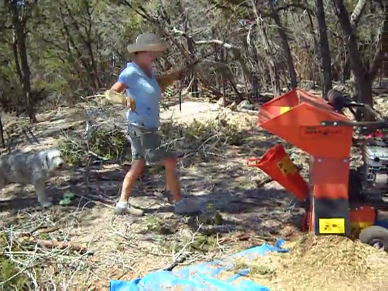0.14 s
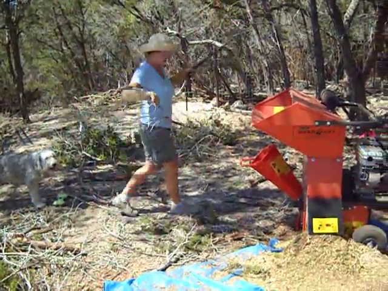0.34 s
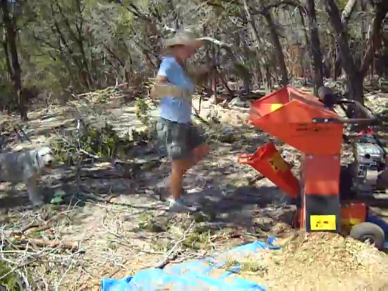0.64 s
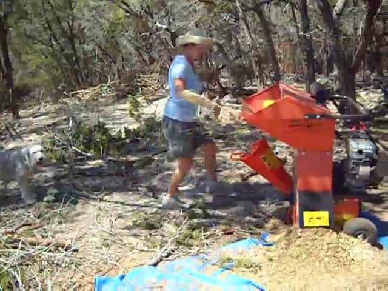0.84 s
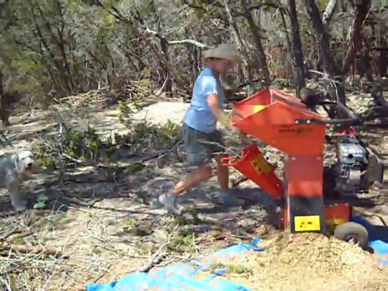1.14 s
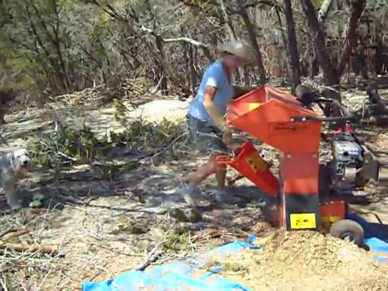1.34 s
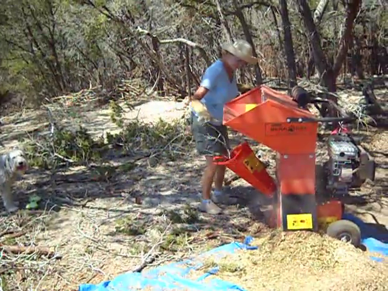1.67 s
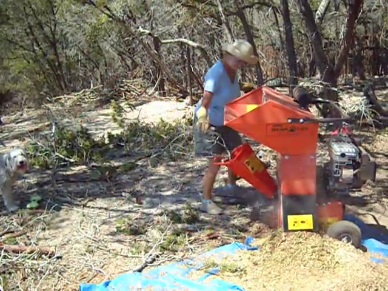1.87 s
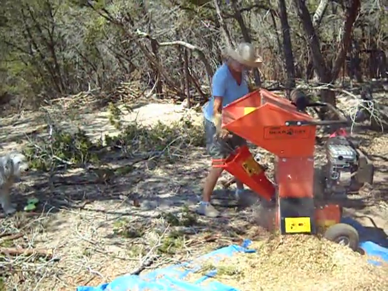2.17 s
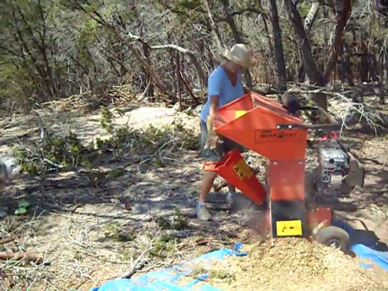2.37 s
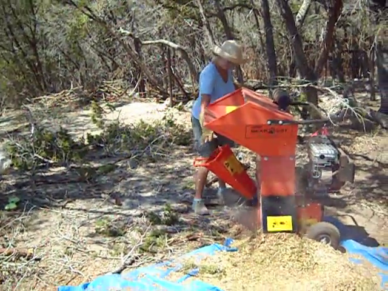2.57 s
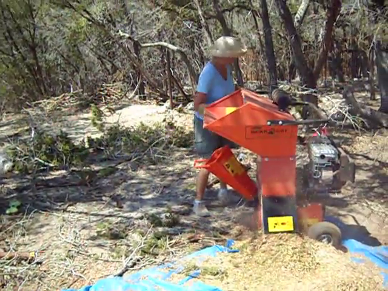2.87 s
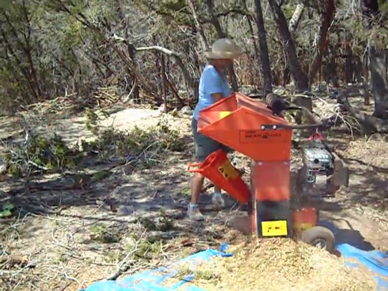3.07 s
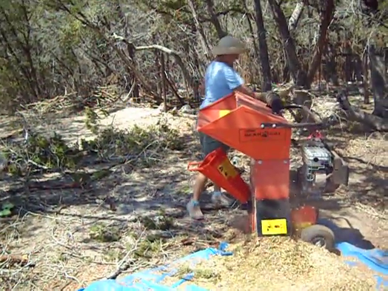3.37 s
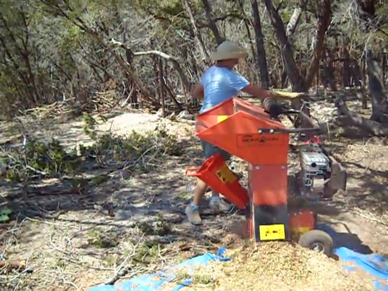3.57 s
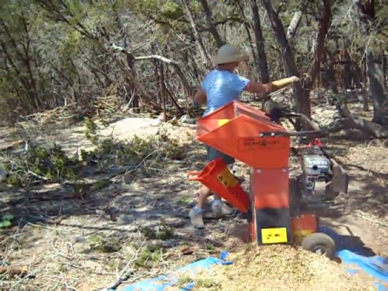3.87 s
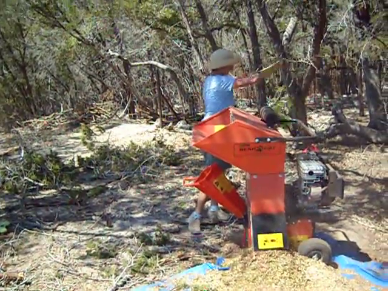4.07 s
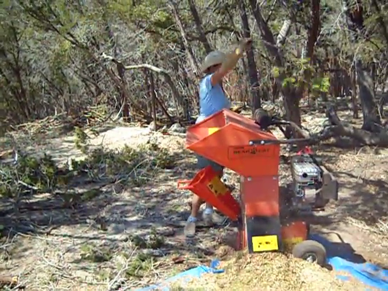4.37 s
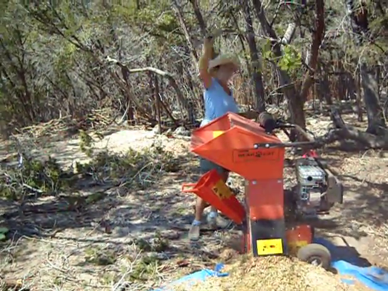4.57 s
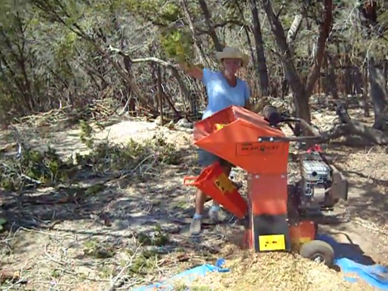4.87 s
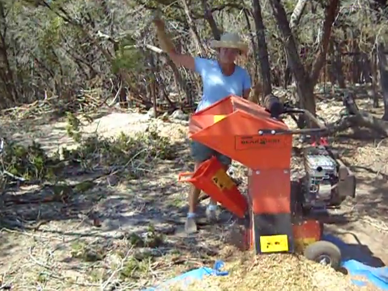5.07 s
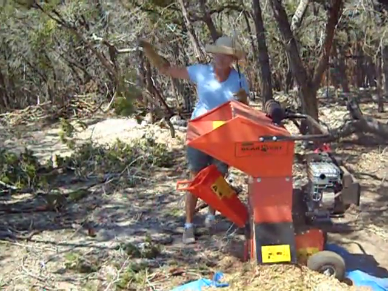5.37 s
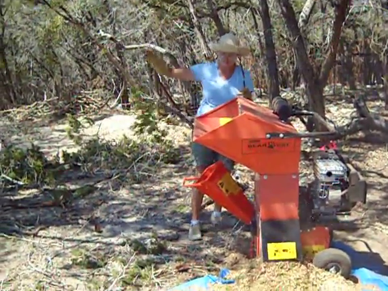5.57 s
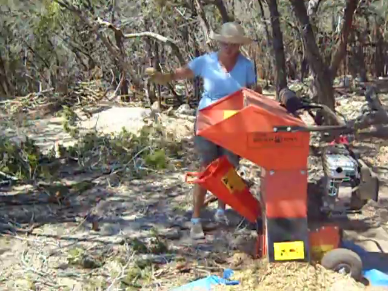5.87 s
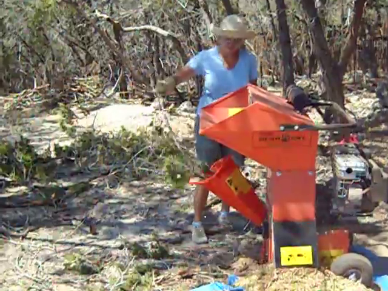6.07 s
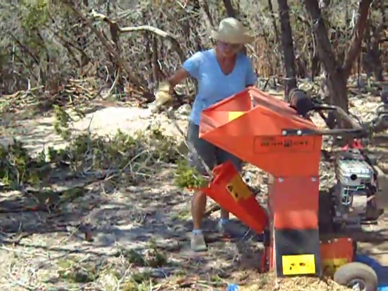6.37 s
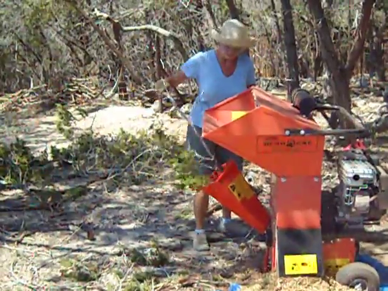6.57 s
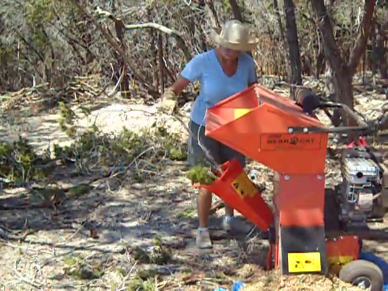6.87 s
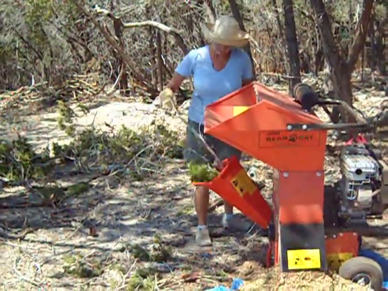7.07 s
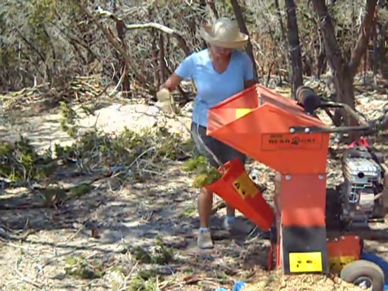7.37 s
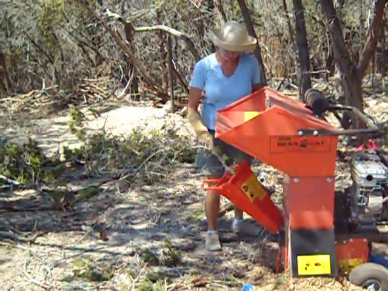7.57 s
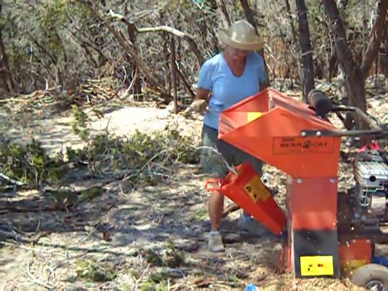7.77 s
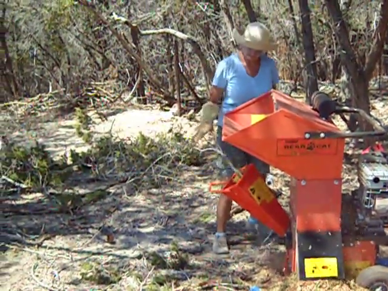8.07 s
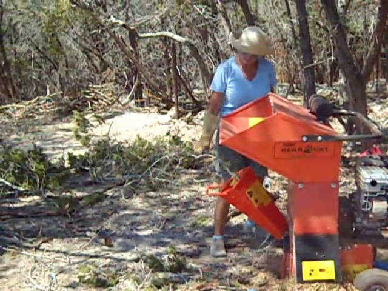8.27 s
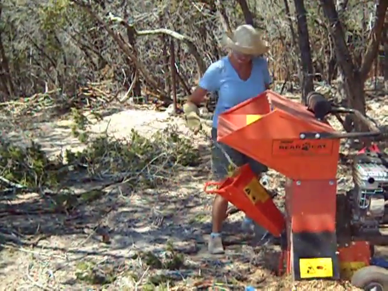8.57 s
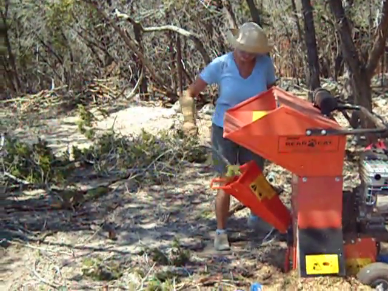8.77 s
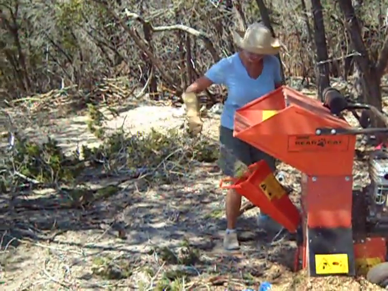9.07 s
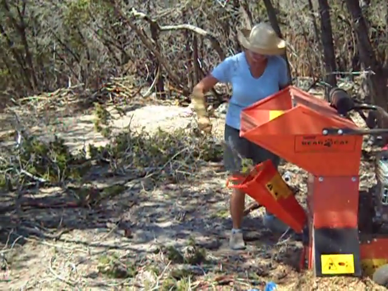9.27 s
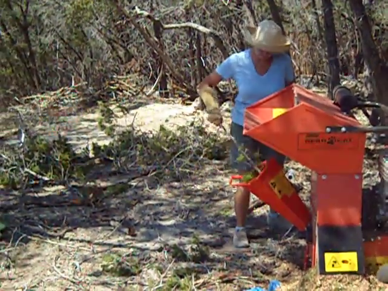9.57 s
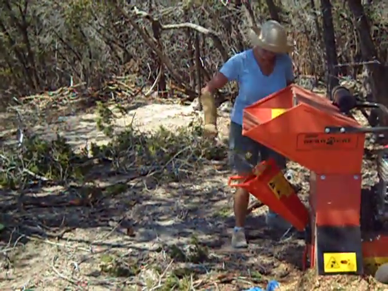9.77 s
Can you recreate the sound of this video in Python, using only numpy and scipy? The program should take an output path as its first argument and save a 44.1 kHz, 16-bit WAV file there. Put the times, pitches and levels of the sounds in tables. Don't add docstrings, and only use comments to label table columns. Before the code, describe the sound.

Steady buzzing engine roar of a garden chipper, broken by clattering, booming bites of wood and sharp chip knocks, muffled and distorted on the peaks.

```python
import sys
import numpy as np
from scipy import signal
from scipy.fft import rfft, irfft, next_fast_len
from scipy.io import wavfile

SR = 44100
rng = np.random.default_rng(int(sys.argv[2]) if len(sys.argv) > 2 else 0)


def bounce(signal):
    frames = np.transpose(np.atleast_2d(signal))
    limited = np.clip(frames, -1, 1)
    pcm = np.round(limited * 32767).astype(np.int16)
    wavfile.write(sys.argv[1], SR, pcm)


def voltage_ratio(level):
    return 10 ** (np.asarray(level, float) / 20)


N = 438354

# start_s, crank_turns_per_s, slip_turns_per_s
SHAFT_SPEEDS = [(0.0, 60.309, 0.477), (0.85, 60.303, 0.525), (1.3, 60.019, 0.654), (1.8, 60.237, 0.508),
                (2.25, 59.399, 0.745), (2.6, 59.718, 0.772), (3.15, 60.229, 0.627), (3.9, 60.349, 0.588),
                (4.7, 59.846, 0.541), (5.35, 60.365, 0.635), (6.5, 60.248, 0.478), (6.9, 60.303, 0.647),
                (7.33, 60.625, 0.527), (7.72, 58.264, 0.716), (8.05, 59.965, 0.911), (8.55, 60.172, 0.548),
                (9.0, 60.241, 0.601), (9.94, 60.36, 0.52)]
# multiple of the firing rate, level_db (rms)
FIRING_TONES = [(1, -36.5), (2, -41.5), (3, -31), (4, -18), (5, -23), (6, -26.5), (7, -30), (8, -33),
                (9, -39), (10, -30), (11, -29.5), (12, -24.5), (13, -33.5), (14, -34), (15, -37.5),
                (16, -39.5), (17, -34.5), (18, -42), (19, -29), (20, -32), (21, -43.5), (22, -25.5),
                (23, -32.5), (24, -37.5), (25, -36), (26, -27.5), (27, -42.5), (28, -43), (29, -45.5),
                (30, -33.5), (31, -36), (32, -41), (33, -37.5), (34, -50), (35, -45.5)]
# multiple of the firing rate, gain_db per unit of opening
THROTTLE_GAIN = [(1, 0), (2, 5.5), (3, 3.5), (4, -2), (5, 3.5), (6, 4), (7, 0), (10, -3)]
FRAME_ROCKING = {3: (0.082, -2.1), 4: (0.19, 0.81), 5: (0.21, 1.6), 6: (0.32, 0.28), 7: (0.25, 0.6),
                 9: (0.7, 1.8), 10: (0.94, 0.75), 11: (0.17, -3.2), 12: (0.42, -2.3), 14: (0.98, .1),
                 19: (0.078, 2.2), 22: (0.11, 1.8), 24: (0.36, -1.8), 26: (0.26, -1.9)}
# multiple of the firing rate, slips below it, level_db (rms), sign
FRAME_TONES = [(4, 1, -37, -1), (6, 2, -33, -1), (22, 10, -36, 1)]
# multiple of the rotor speed, level_db (rms), sign against the engine
ROTOR_TONES = [(1, -40, 1), (2, -32.5, -1), (3, -44, -1), (4, -24, -1), (5, -36, 1), (6, -28, -1),
               (8, -35, 1), (10, -33, -1), (11, -41, 1), (12, -28, -1), (14, -30, 1), (16, -38, 1)]
# multiple of the rotor speed, level_db (rms)
PULLEY_TONES = [(3.243, -35), (6.486, -39), (11.35, -37)]
# start_s, length_s, panel_boom_db, splinter_crackle_db
TWIG_BITES = [(1.07, 0.032, -10.5, -16.5), (1.122, .035, -10.5, -19.5), (1.36, 0.049, -11, -16.5),
              (1.411, 0.055, -6, -18.5), (1.718, .015, -27, -26.5), (2.016, 0.063, -3.5, -9),
              (2.104, 0.096, -5, -13.5), (2.171, 0.036, -6.5, -12), (2.221, 0.037, -8, -12.5),
              (2.292, .07, -5, -10), (2.44, 0.14, -7, -13), (2.608, 0.036, -10, -18.5),
              (2.861, .04, -14, -22.5), (3.395, .04, -15.5, -20.5), (3.613, 0.036, -21, -24),
              (4.097, .08, -13.5, -18.5), (4.379, 0.051, -11, -20), (4.444, 0.049, -12.5, -20),
              (4.533, .025, -13, -13), (4.71, 0.08, -18.5, -18.5), (4.859, 0.016, -14, -19.5),
              (5.087, .04, -28, -23), (5.317, 0.067, -30, -22), (5.446, .03, -25.5, -18),
              (5.884, 0.057, -22, -19.5), (7.514, .1, -3, -10.5), (7.633, 0.1, -2, -8),
              (7.794, .08, -9, -16.5), (8.007, 0.038, -17, -31), (8.618, .05, -15.5, -24)]
# pitch_hz, width_hz, level_db
PANEL_RINGS = [(357, 36, -6.5), (425, 35, -11), (468.5, 16, -11.5), (529.4, 40, -10.5), (594.6, 75, -9.5),
               (638, 51, -3.5), (696.1, 22, 3), (821.7, 25.3, -1), (868, 25, -4), (939, 29, -8),
               (1038.6, 50, -11.5), (1249, 83, -19)]
# pitch_hz, width_hz, level_db
PLATE_RINGS = [(1326, 37, -3), (1890, 690, -9.5), (2170, 190, -2), (2516, 100, -1.5), (2965, 180, 0),
               (3143, 170, -0.5), (3745, 570, -3.5)]
# start_s, peak_db
HARD_CHIPS = [(0.885, -1.5), (1.083, -1.5), (1.486, -7), (4.108, -1), (4.149, -1), (4.348, -11),
              (4.549, 1.5), (4.661, 2.5), (4.754, -13), (4.886, -16), (5.417, -2.5), (5.459, 0.5),
              (5.926, -1), (7.113, -0.5), (7.249, -11.5), (8.61, -2.5)]
# pitch_hz, width_hz, level_db
CORNER_RINGS = [(760, 180, 0), (2120, 300, -10.5), (3150, 570, -6)]
# pitch_hz, width_hz, level_db
CLATTER_RINGS = [(2118, 121, 0.6), (2582, 140, 1), (2870, 370, -3.5), (3255, 120, 2.7), (3730, 320, -4.5)]
# pitch_hz, level_db (per Hz)
AIR_COLOUR = [(25, -62), (70, -64), (130, -47.5), (260, -51.5), (400, -44.5), (500, -49), (680, -45.5),
              (850, -50), (1050, -53.5), (1150, -61.5), (1300, -57.5), (1500, -66.5), (1850, -68),
              (2300, -72.5)]

SLIP_START_TURNS, HUNT_RADIANS = .307, .025
GOVERNOR_LAG_S, IDLE_CRANK_HZ, IDLE_FIRINGS_PER_S = .04, 60.3, 30.12
KNOCK_LEAD_CYCLES, MUFFLER_LAG_CYCLES = .527, .31
MUFFLER_TOP = 15
PIPE_SPREAD = .046
BITE_RISE_DB_PER_S, BITE_FALL_DB_PER_S = 699.5, 399.5
EMPTY_BOOM_DB, EMPTY_CRACKLE_DB = -19.5, -33.5
CRUMB_SHARE_DB, CRUMB_DRAIN_S, CRUMB_FLICKER_DB = -6, 2.3, 2.5
ROAR_DB, CLATTER_DB = -18.5, -27
ROAR_REPEAT = .35
INPUT_TOP, INPUT_KNEE = 0.73, 8.1
SAMPLING_HZ, CONVERTER_TOP = 8000, .707


def rms_one(x):
    return x / np.sqrt(np.mean(x ** 2) + 1e-20)


def in_time(rows):
    start_s, *columns = np.transpose(rows)
    return [np.interp(np.arange(N) / SR, start_s, column) for column in columns]


def drift(rate_hz):
    r = np.exp(-80 * np.pi * rate_hz / SR)
    noise = rng.standard_normal(N // 40 + 2002)
    slow = rms_one(signal.lfilter([1], [1, -2 * r, r * r], noise)[2000:])
    return np.interp(np.arange(N) / 40, np.arange(len(slow)), slow)


def knocks(per_s, spread_db):
    size_db = spread_db * np.minimum(rng.exponential(1, N), 4)
    sizes = voltage_ratio(size_db) * rng.choice([-1, 1], N)
    return rms_one(sizes * (rng.random(N) < per_s / SR))


def resonate(blows, rings, wander_db):
    out = 0
    for i, (pitch_hz, width_hz, level_db) in enumerate(rings):
        r = np.exp(-np.pi * width_hz / SR)
        feedback = [1, -2 * r * np.cos(2 * np.pi * pitch_hz / SR), r * r]
        rung = signal.lfilter([1, 0, -1], feedback, blows + 1e-18)
        gain = voltage_ratio(level_db + wander_db * drift(6.6)) * (1 - r * r) / 2
        out = out + (-1) ** i * gain * rung
    return out


def tone(level_db, angle, waver_db):
    return np.sqrt(2) * voltage_ratio(level_db + waver_db * drift(3.1)) * np.cos(angle)


def pulse_phases():
    level_db = np.r_[-60, np.array(FIRING_TONES)[:, 1], np.linspace(-50, -70, 29)]
    cepstrum = irfft(np.log(voltage_ratio(level_db)))
    cepstrum[1:64] *= 2
    cepstrum[65:] = 0
    k = np.arange(65)
    shift_cycles = KNOCK_LEAD_CYCLES - MUFFLER_LAG_CYCLES * (k <= MUFFLER_TOP)
    return rfft(cepstrum).imag + 2 * np.pi * k * shift_cycles - PIPE_SPREAD * k ** 2


def engine(cycle, slip, crank_hz):
    phases = pulse_phases()
    multiple, gain_db = np.transpose(THROTTLE_GAIN)
    late_hz = np.interp(np.arange(N) - GOVERNOR_LAG_S * SR, np.arange(N), crank_hz)
    opening = (IDLE_CRANK_HZ - late_hz) ** 2 / 2
    rock = np.exp(1j * slip)
    out = 0
    for k, db in FIRING_TONES:
        depth, lead = FRAME_ROCKING.get(int(k), (0, 0))
        level_db = db + opening * np.interp(k, multiple, gain_db)
        swell = 1 + (depth * np.exp(1j * lead) * rock).real
        out = out + tone(level_db, k * cycle + phases[int(k)], waver_db=.6) * swell
    return out


def frame(cycle, slip):
    phases = pulse_phases()
    return sum(sign * tone(db, k * cycle - slips * slip + phases[int(k)], waver_db=1.)
               for k, slips, db, sign in FRAME_TONES)


def rotor(turn):
    phases = pulse_phases()
    flails = sum(sign * tone(db, k * turn + phases[int(2 * k)], waver_db=.7) for k, db, sign in ROTOR_TONES)
    pulley = sum(tone(db, k * turn, waver_db=2.) for k, db in PULLEY_TONES)
    return flails + pulley


def feed():
    step = 64
    t = np.arange(0, N, step) / SR
    start_s, length_s, boom_db, crackle_db = np.transpose(TWIG_BITES)[:, :, None]
    rise_db = -BITE_RISE_DB_PER_S * np.maximum(start_s - t, 0)
    fall_db = -BITE_FALL_DB_PER_S * np.maximum(t - start_s - length_s, 0)
    edge_db = rise_db + fall_db
    boom = (voltage_ratio(boom_db + edge_db) ** 2).sum(axis=0)
    crackle = (voltage_ratio(crackle_db + edge_db) ** 2).sum(axis=0)
    keep = np.exp(-step / SR / CRUMB_DRAIN_S)
    crumbs = signal.lfilter([1 - keep], [1, -keep], crackle) * voltage_ratio(CRUMB_SHARE_DB) ** 2
    boom_flicker = voltage_ratio(CRUMB_FLICKER_DB * drift(7)[::step]) ** 2
    crackle_flicker = voltage_ratio(CRUMB_FLICKER_DB * drift(2.4)[::step]) ** 2
    boom = boom + boom_flicker * voltage_ratio(EMPTY_BOOM_DB) ** 2
    crackle = crackle + crackle_flicker * (voltage_ratio(EMPTY_CRACKLE_DB) ** 2 + crumbs)
    return [np.interp(np.arange(N) / SR, t, 10 * np.log10(power)) for power in (boom, crackle)]


def chipping(turn):
    boom_db, crackle_db = feed()
    boom_db = boom_db + .6 * np.minimum(boom_db + 16, 0)
    rows = voltage_ratio(3 * np.cos(4 * turn) + 1.2 * drift(30))
    blows = knocks(1500, 3.2) * rows
    splinters = knocks(3500, 3.2) * rows
    boom = resonate(blows * voltage_ratio(boom_db), PANEL_RINGS, wander_db=1.5)
    crackle = resonate(splinters * voltage_ratio(crackle_db), PLATE_RINGS, wander_db=1.5)
    return voltage_ratio(18.5) * boom + voltage_ratio(10.0) * crackle


def snaps():
    start_s, peak_db = np.transpose(HARD_CHIPS)
    blows = np.zeros(N)
    blows[(start_s * SR).astype(int)] = voltage_ratio(peak_db + 22.0)
    return resonate(blows, CORNER_RINGS, wander_db=2.0)


def clatter(cycle):
    beat_db = 2.0 * np.cos(2 * cycle - 3.5) + 0.9 * np.cos(cycle - 2.2)
    rattle = resonate(knocks(5000, 1.1) * voltage_ratio(beat_db), CLATTER_RINGS, wander_db=0.0)
    return voltage_ratio(CLATTER_DB) * rms_one(rattle)


def roar(cycle, turn):
    size = next_fast_len(N)
    hz = np.maximum(np.arange(size // 2 + 1) * SR / size, 1)
    pitch_hz, level_db = np.transpose(AIR_COLOUR)
    colour = voltage_ratio(np.interp(np.log(hz), np.log(pitch_hz), level_db, right=-90))
    swirl = 1 / (1 - ROAR_REPEAT * np.exp(-2j * np.pi * hz / IDLE_FIRINGS_PER_S))
    noise = rfft(rng.standard_normal(N), size)
    air = rms_one(irfft(noise * colour * swirl, size)[:N])
    puffs_db = 1.3 * np.cos(cycle + 0.36) + 0.63 * np.cos(2 * turn) + 0.51 * drift(4.8)
    return voltage_ratio(ROAR_DB + puffs_db) * air


def scene():
    crank_hz, slip_hz = in_time(SHAFT_SPEEDS)
    cycle = np.pi * np.cumsum(crank_hz) / SR
    slip = 2 * np.pi * (SLIP_START_TURNS + np.cumsum(slip_hz) / SR)
    turn = 2 * cycle - slip
    fired = cycle + HUNT_RADIANS * drift(4)
    machine = engine(fired, slip, crank_hz) + frame(cycle, slip) + rotor(turn)
    wood = chipping(turn) + snaps()
    return (machine + wood + clatter(cycle) + roar(cycle, turn))[None]


def low_pass(x, edge_hz, order):
    size = next_fast_len(N + 4096)
    hz = np.arange(size // 2 + 1) * SR / size
    return irfft(rfft(x, size) / (1 + (hz / edge_hz) ** (2 * order)), size)[..., :N]


def top_cut(x):
    return signal.sosfilt(signal.butter(12, 15900, fs=SR, output="sos"), x)


def record(dry):
    rounded = dry / (1 + np.abs(dry / INPUT_TOP) ** INPUT_KNEE) ** (1 / INPUT_KNEE)
    narrow = low_pass(rounded, 3750, order=15)
    mirror = 2 * narrow * np.cos(2 * np.pi * SAMPLING_HZ * np.arange(N) / SR)
    played = low_pass(narrow + mirror, 4150, order=24)
    played = np.clip(played, -CONVERTER_TOP, CONVERTER_TOP)
    return top_cut(played)


dry = scene()
out = record(dry)
bounce(out)
```